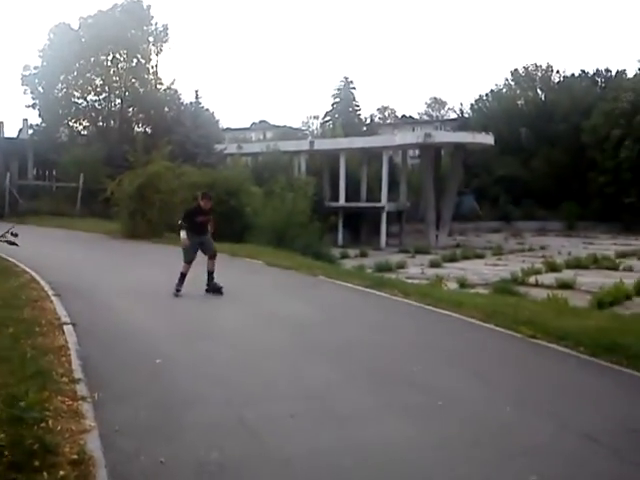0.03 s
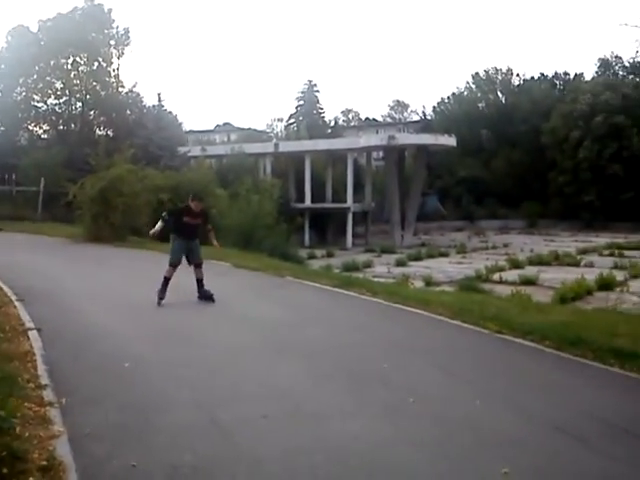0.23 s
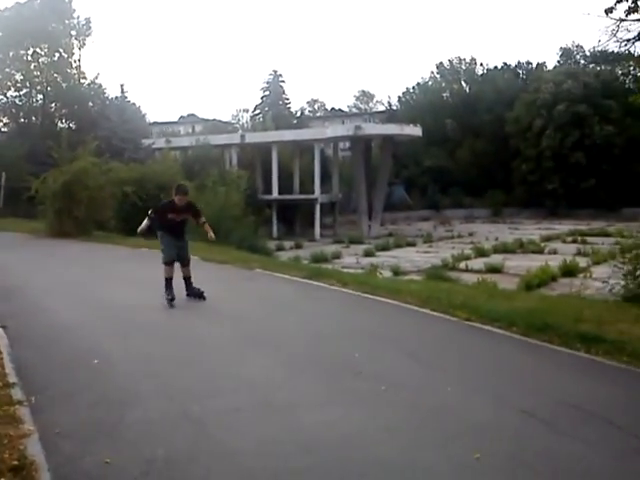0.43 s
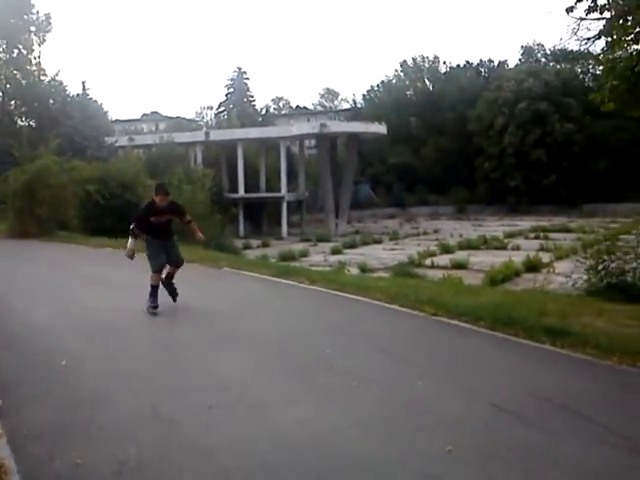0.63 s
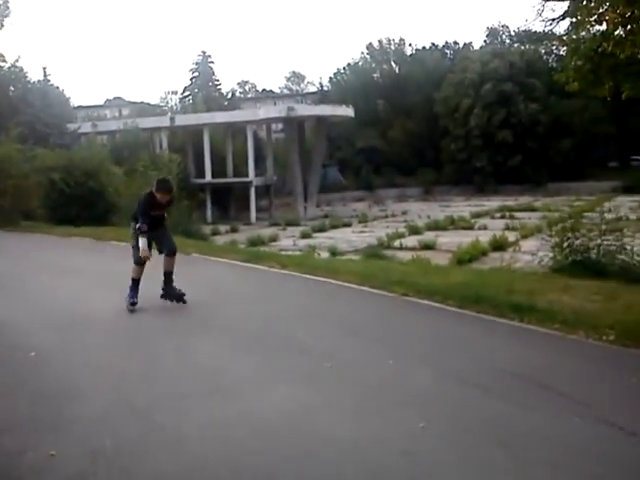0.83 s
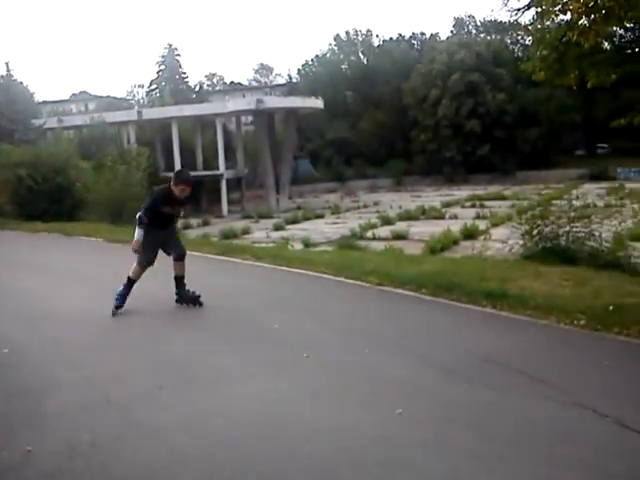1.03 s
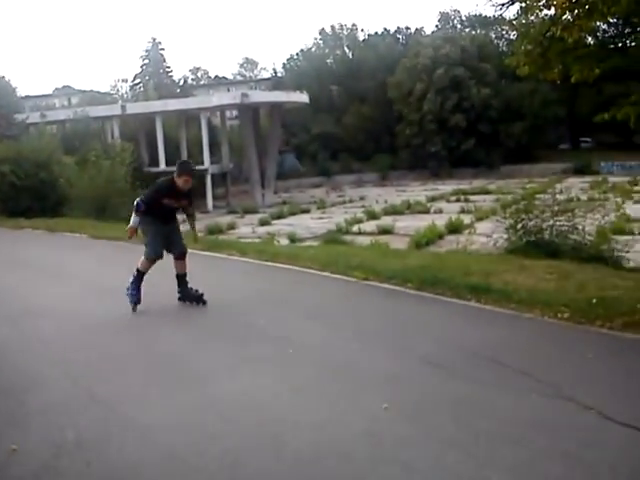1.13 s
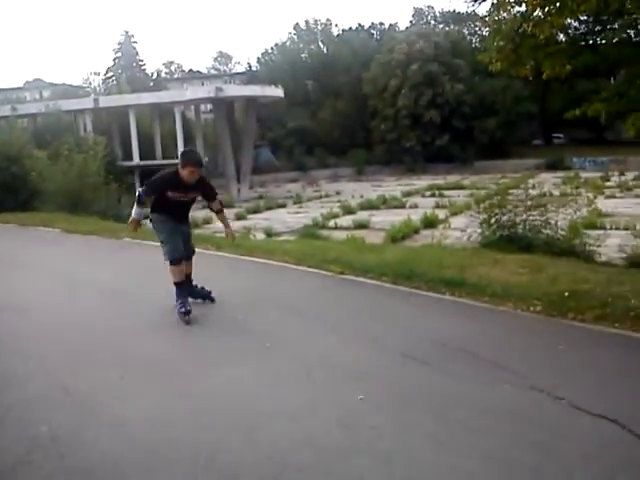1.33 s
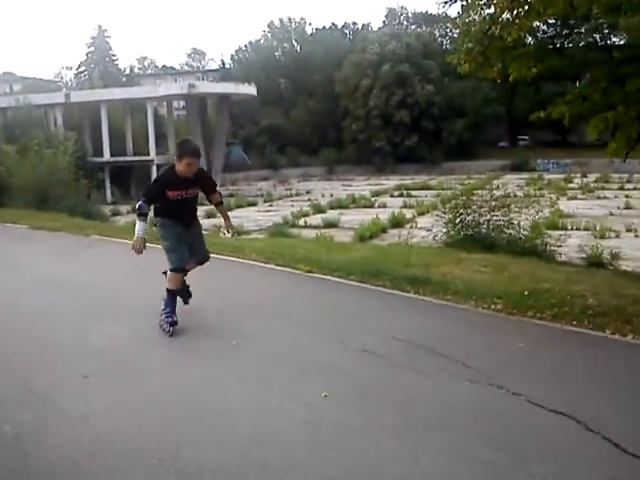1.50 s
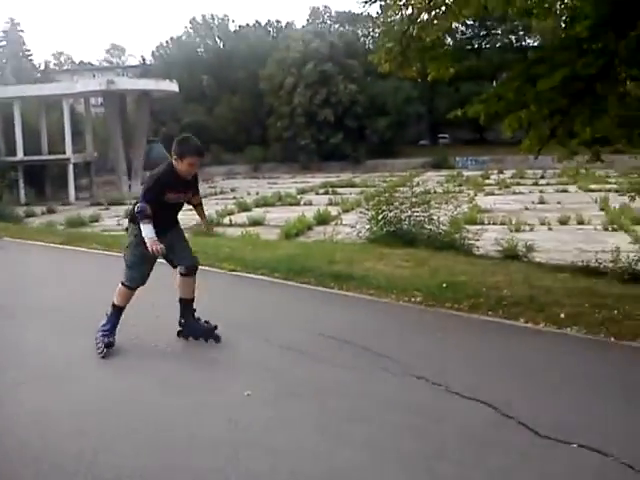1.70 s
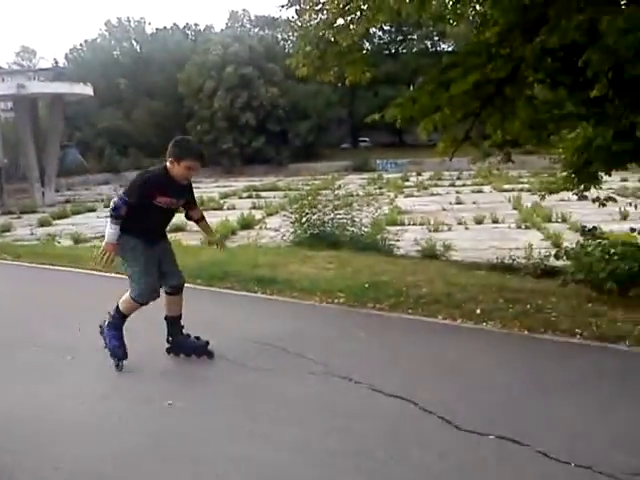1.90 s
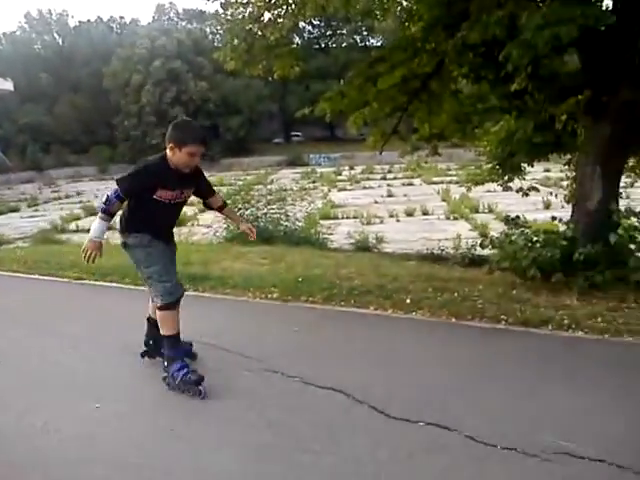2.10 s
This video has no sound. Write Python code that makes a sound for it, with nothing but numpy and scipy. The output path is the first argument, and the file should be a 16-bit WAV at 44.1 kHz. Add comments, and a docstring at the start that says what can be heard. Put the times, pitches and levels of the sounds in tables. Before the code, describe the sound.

Inline skates stride along an asphalt park path, landing with five sharp, evenly spaced clacks. Between them the wheels hiss softly and tick on grit over a low outdoor rumble. The microphone gives a thin, dull sound.

```python
"""An inline skater strides along an asphalt path in a park.
From the start, the wheels hiss on the rough ground over a low outdoor rumble.
After 0.2 s comes the first of five strides: wheels land in quick succession, and frame and boot ring.
Between strides the wheels roll and tick on grit; from about 1 s they also scrub faintly sideways.
All of it passes through a recorder that cuts bass and treble and clips the hardest knocks."""
import sys
import numpy as np
from scipy import signal
from scipy.fft import rfft, irfft
from scipy.io import wavfile
from scipy.ndimage import uniform_filter1d

SR = 44100
rng = np.random.default_rng(int(sys.argv[2]) if len(sys.argv) > 2 else 0)


def log_audio(samples):
    """Write samples as a 16-bit WAV file to the path given in sys.argv[1]."""
    # one column per channel
    frames = np.atleast_2d(samples).T
    # limit to full scale, then quantise
    limited = np.clip(frames, -1, 1)
    pcm = np.round(limited * 32767).astype(np.int16)
    wavfile.write(sys.argv[1], SR, pcm)


N = 94815


def undb(db):
    """Turn decibels into a factor to multiply by."""
    return 10 ** (np.asarray(db) / 20)


def unit(x):
    """Scale a sound so that its average size (rms) is 1."""
    return x / np.sqrt(np.mean(x ** 2))


def unit_peak(x):
    """Scale a sound so that its highest peak is 1."""
    return x / np.abs(x).max()


def colour(x, points):
    """Shape a sound's tone along (f/Hz, level/dB) points, then scale it to rms 1."""
    hz, db = np.array(points).T
    f = np.maximum(np.fft.rfftfreq(len(x), 1 / SR), 1)
    gain = undb(np.interp(np.log(f), np.log(hz), db))
    return unit(irfft(rfft(x) * gain, len(x)))


def drift(rate_hz):
    """A smooth random wobble, mostly between -1 and 1."""
    hold = int(SR / rate_hz)
    steps = np.repeat(rng.standard_normal(N // hold + 1), hold)
    return 0.92 * uniform_filter1d(uniform_filter1d(steps, hold), hold)[:N]


def fade_in(t, rise_s):
    """A smooth rise from 0 to 1."""
    return 1 - np.exp(-(t / rise_s) ** 2)


def add(out, start_s, x):
    """Mix x into out at the given time."""
    i = int(start_s * SR)
    out[i:i + len(x)] += x[:len(out) - i]


def ring(modes, boost_db, stretch, t):
    """A struck object rings at its own fading tones (modes), a little differently each time."""
    hz, db, fade_s = np.array(modes).T[:, :, None]
    scatter, detune, phase = rng.standard_normal((3, len(hz), 1))
    gain = undb(db + boost_db + 1.5 * scatter - 60 * t / (fade_s * stretch))
    tones = np.sin(2 * np.pi * (hz * (1 + 0.017 * detune) * t + phase))
    return (gain * tones).sum(0)


def rumble(t):
    """Low, distant outdoor noise that swells and sinks."""
    # tone of the rumble: f/Hz, level/dB
    spectrum = [(20, 8), (45, -3.5), (72, -11.5), (95, -4.5), (128, 1), (165, -4.5), (210, -6.5),
                (270, -13), (400, -19.5), (700, -30), (2000, -50.5)]
    # its rise and fall: t/s, relative level/dB
    swell = [(0, -35), (.3, -36.5), (.47, -36), (.6, -39.5), (.75, -39), (.9, -31.5), (1.08, -39),
             (1.35, -37), (1.55, -42.5), (1.85, -40.5), (2.15, -40.5)]
    level_db = np.interp(t, *np.array(swell).T) + 5.5
    return colour(rng.standard_normal(N), spectrum) * undb(level_db)


def reflections(x):
    """Sound bounces quickly off the ground and the skater, then faintly off the trees."""
    near_db, near_s, far_db, far_s = -17.5, 0.017, -18.5, 0.064
    t = np.arange(SR // 2) / SR
    near, far = rng.standard_normal((2, len(t))) * fade_in(t, rise_s=0.0047)
    echo = undb(near_db) * unit(near * np.exp(-t / near_s))
    echo += undb(far_db) * unit(far * np.exp(-t / far_s))
    return signal.fftconvolve(x, echo / np.sqrt(len(t)))[:N]


def scrubs():
    """A wheel sliding sideways in the push sings faintly: a narrow band of noise that glides."""
    # wheel slides: start t/s, length/s, level/dB, start f/Hz, end f/Hz
    slides = [(1.069, 0.072, -39.5, 715, 955), (1.104, .13, -41, 1300, 1350), (1.378, .06, -40, 1095, 1010),
              (1.931, 0.23, -41.5, 1146, 1108)]
    width_hz = 230
    smooth = signal.butter(2, width_hz / 2, fs=SR, output="sos")
    out = np.zeros(N)
    for start_s, length_s, db, start_hz, end_hz in slides:
        progress = np.linspace(0, 1, int(length_s * SR))
        slip = signal.sosfilt(smooth, rng.standard_normal((2, N)))[:, -len(progress):]
        phase = 2 * np.pi * np.cumsum(start_hz + (end_hz - start_hz) * progress) / SR
        singing = slip[0] * np.cos(phase) + slip[1] * np.sin(phase)
        add(out, start_s, undb(db) * unit(singing * np.sin(np.pi * progress)))
    return out


def rolling(t):
    """Wheels run over dense asphalt grains; loudness and brightness follow the push of the legs."""
    # tone of the rolling: f/Hz, level/dB
    spectrum = [(150, -28.5), (300, -1.5), (450, -2.5), (620, -3.5), (800, 0), (1000, 4), (1300, 1),
                (1600, -0.5), (2000, -0.5), (2450, -8.5), (3050, -15.5), (3600, -37.5), (4400, -53)]
    # push of the legs: t/s, level before the tilt/dB, tilt towards treble/(dB per octave)
    push = [(0, -36, 0.5), (.2, -35, 1.5), (.35, -34.5, 2), (.55, -37, 0), (0.751, -35.5, -1),
            (.98, -36, 1), (1.1, -35, 4), (1.199, -37, 0), (1.3, -37, 0), (1.418, -39, 0),
            (1.559, -39.5, 2.5), (1.699, -40, 0.5), (1.8, -40, 0), (1.92, -38.5, 0), (2.05, -38, 0),
            (2.15, -39.5, 1.5)]
    times, db, tilt = np.array(push).T
    grains_per_s, spread_db, grit_db, flicker_db = 900, 2.5, -2, 1.9
    grit = (rng.random(N) < grains_per_s / SR) * rng.choice([-1, 1], N)
    grit = grit * undb(spread_db * np.minimum(rng.exponential(size=N), 5))
    road = rfft(colour(rng.standard_normal(N) + undb(grit_db) * unit(grit), spectrum))
    hz = np.maximum(np.fft.rfftfreq(N, 1 / SR), 1)
    octave = np.clip(np.log2(hz / 1300), -2, 2)
    out = np.zeros(N)
    for centre in np.arange(-4, 5) / 2:  # bands half an octave apart, each flickering on its own
        band = irfft(road * np.maximum(1 - 2 * abs(octave - centre), 0), N)
        out += band * undb(centre * np.interp(t, times, tilt) + flicker_db * drift(rate_hz=27.56))
    return out * undb(np.interp(t, times, db))


def wheel_hit(centre_hz, stretch, t):
    """A wheel hits: a crunch and a ring, both favouring pitches near centre_hz; stretch lengthens them."""
    # tones of wheel, frame and shell: f/Hz, level/dB, time to fade by 60 dB/s
    modes = [(807, -7, 0.025), (926, 0, 0.024), (1066, -2.5, 0.026), (1254, -5, .02), (1382, 4.5, 0.011),
             (1525, -3.5, 0.013), (1752, -2, 0.02), (1992, 0.5, 0.022), (2298, -0.5, 0.011),
             (2826, -9, 0.0091), (3330, -14.5, 0.0082)]
    # tone of the crunch: f/Hz, level/dB
    spectrum = [(100, -24), (300, -10.5), (600, -5.5), (1000, -3), (2000, -1.5), (3000, -6.5),
                (4000, -13.5), (6000, -37.5)]
    crunch_db, crunch_s = -8, 0.0061

    def focus_db(hz, octaves):
        """Turn a pitch down more the further it lies from centre_hz."""
        return -20 * np.log10(1 + (np.log2(hz / centre_hz) / octaves) ** 2)

    attack = fade_in(t, rise_s=0.00056)
    ringing = ring(modes, focus_db(np.array(modes)[:, :1], octaves=0.34), stretch, t) * attack
    focused = [(hz, db + focus_db(hz, octaves=1.42)) for hz, db in spectrum]
    crunch = colour(rng.standard_normal(len(t)), focused) * np.exp(-t / (crunch_s * stretch)) * attack
    return unit_peak(unit_peak(ringing) + undb(crunch_db) * unit_peak(crunch))


def ticks(t):
    """Grit and loose wheels make light ticks, with less treble than the landings."""
    # light hits: t/s, peak before the treble cut/dB, centre f/Hz
    hits = [(.292, -22, 1487), (.382, -24, 1200), (.502, -18.5, 1250), (0.565, -25, 1700),
            (.716, -18, 1500), (0.725, -20.5, 1400), (.988, -21, 1814), (1.1717, -16.5, 1400),
            (1.494, -24, 1520), (1.701, -21, 1250), (1.706, -20.5, 1304)]
    treble_cut = signal.butter(4, 2560, fs=SR, output="sos")
    out = np.zeros(N)
    for start_s, db, hz in hits:
        add(out, start_s, undb(db) * signal.sosfilt(treble_cut, wheel_hit(hz, stretch=0.62, t=t)))
    return out


def boot_thump(t):
    """The boot thumps as it takes the skater's weight, more slowly than the wheels do."""
    # low tones of the boot: f/Hz, level/dB, time to fade by 60 dB/s
    modes = [(166, 5, 0.031), (239, 1, 0.038), (372, 2, 0.034), (472, -2.5, 0.0084)]
    return unit_peak(ring(modes, boost_db=0, stretch=1, t=t) * fade_in(t, rise_s=0.0013))


def landings(t):
    """At each stride the wheels land one after another, each with a knock and a thump of the boot."""
    # wheel landings: t/s, peak/dB, centre f/Hz, stretch factor, thump relative to the wheel hit/dB
    hits = [(0.2078, -14.5, 1100, 1.1, -16), (0.2215, 0, 960, 1.05, -21), (0.2311, -5, 1400, 1.4, -21),
            (0.2321, -1.5, 1300, 0.88, -16.5), (0.2507, -15, 1100, 0.77, -28.5),
            (0.6324, -5, 2000, 0.67, -13), (.6345, -3.5, 1300, 0.58, -16), (0.638, -7.5, 1500, 1.06, -8.5),
            (.6440, -25, 1980, 1.3, -25.5), (0.6529, -13, 1400, .7, -27), (1.0449, -7, 2350, 0.9, -12),
            (1.0490, -12.5, 780, 0.58, -12.5), (1.0750, -20.5, 780, 1, -16.5),
            (1.4766, -10, 1400, 0.97, -13), (1.4780, -5.5, 2050, 0.91, -24),
            (1.4810, -12.5, 1270, 1.4, -18), (1.8548, -7.5, 1100, 0.99, -28.5), (1.8640, -15, 1600, 1, -13),
            (1.8680, -.5, 1500, 0.83, -21), (1.8748, -20, 2000, 1.3, -28.5)]
    out = np.zeros(N)
    for start_s, db, hz, stretch, thump_db in hits:
        thump = undb(thump_db) * boot_thump(t)
        knock = wheel_hit(hz, stretch, t) + thump
        add(out, start_s, undb(db) * unit_peak(knock))
    return out


def scene():
    """The skates and the park, mixed into one channel."""
    t = np.arange(N) / SR
    hit_t = t[:SR // 10]  # each hit gets 0.1 s to die away
    knocks = landings(hit_t) + ticks(hit_t)
    return (knocks + reflections(knocks) + rolling(t) + scrubs() + rumble(t))[None]


def record(dry):
    """The microphone loses bass; the recorder cuts treble and flattens the tallest peaks."""
    bass_cut = signal.butter(3, 103.7, "high", fs=SR, output="sos")
    treble_cut = signal.butter(14, 3755, fs=SR, output="sos")
    top_cut = signal.ellip(8, 0.2, 70, 16000, fs=SR, output="sos")
    narrow = signal.sosfilt(treble_cut, signal.sosfilt(bass_cut, dry))
    clipped = np.clip(narrow, -0.71, 0.71)
    return signal.sosfilt(top_cut, clipped)


dry = scene()
out = record(dry)
log_audio(out)
```